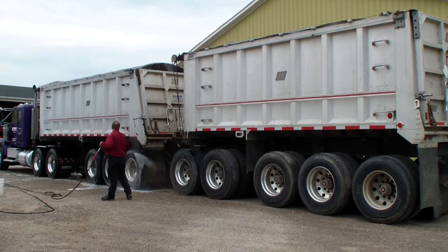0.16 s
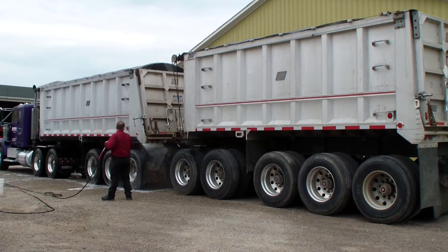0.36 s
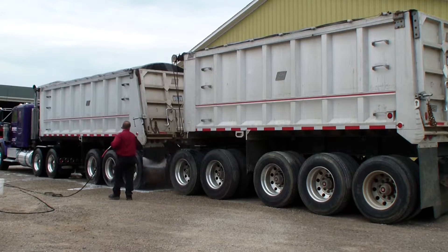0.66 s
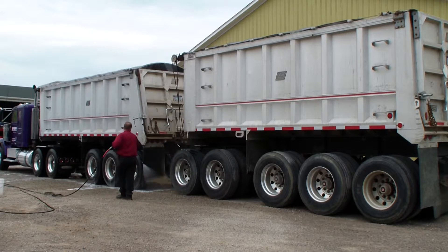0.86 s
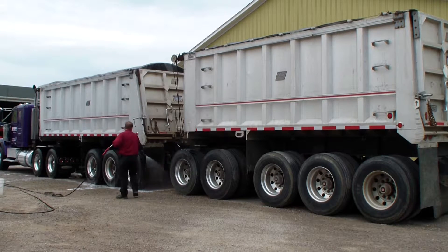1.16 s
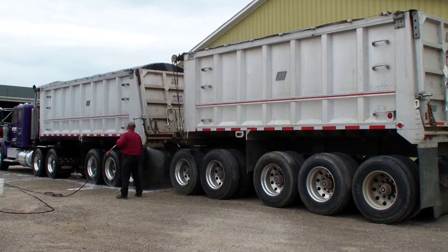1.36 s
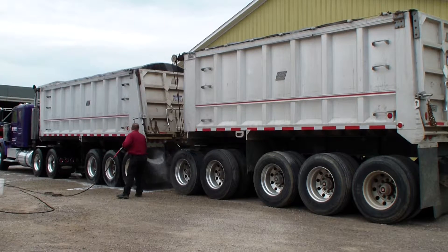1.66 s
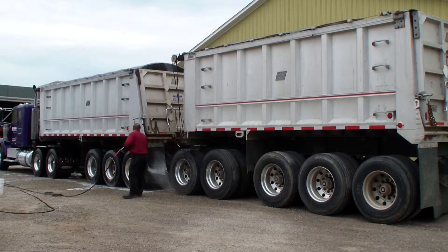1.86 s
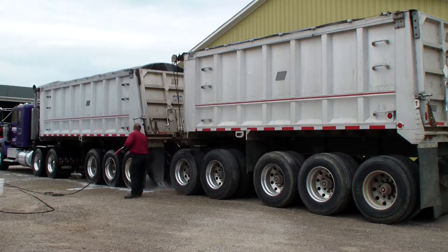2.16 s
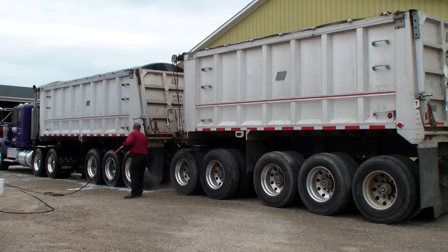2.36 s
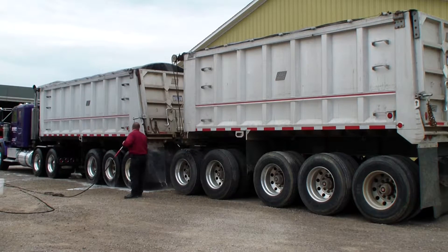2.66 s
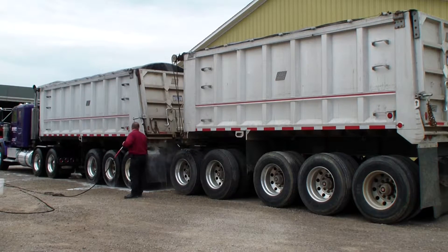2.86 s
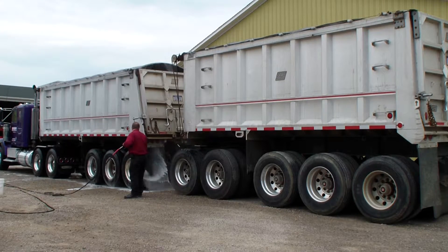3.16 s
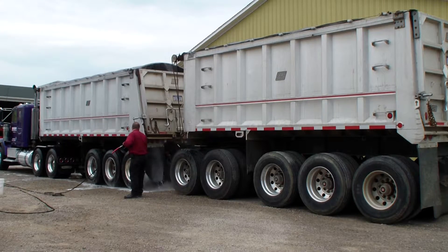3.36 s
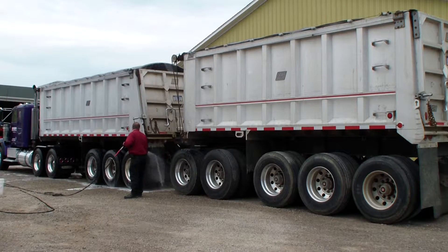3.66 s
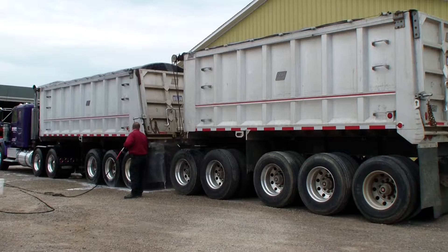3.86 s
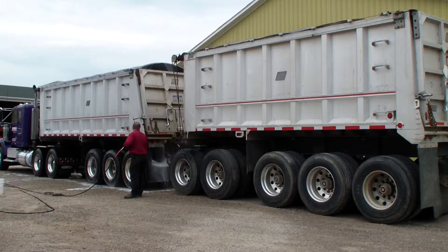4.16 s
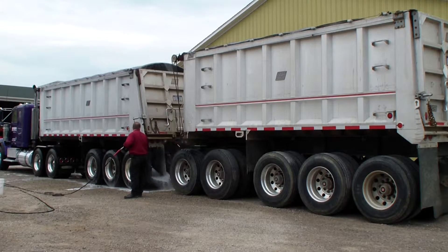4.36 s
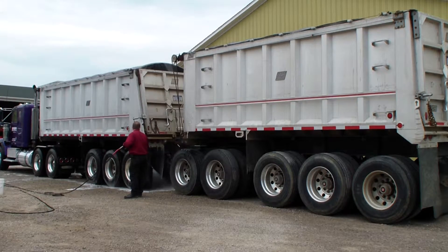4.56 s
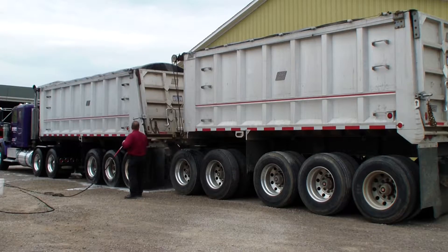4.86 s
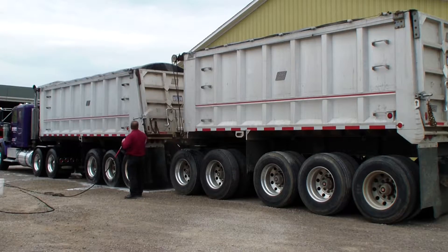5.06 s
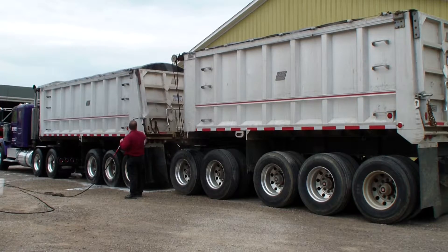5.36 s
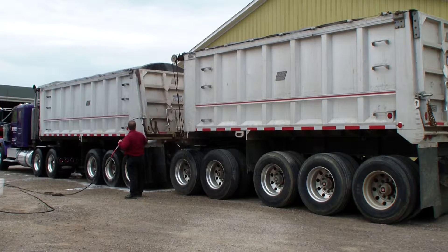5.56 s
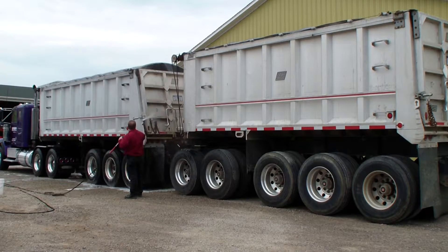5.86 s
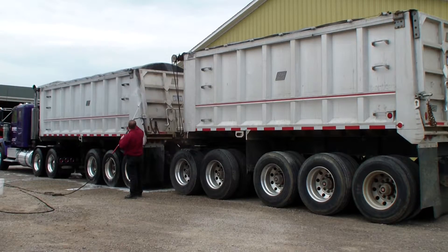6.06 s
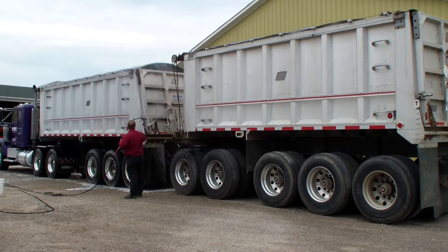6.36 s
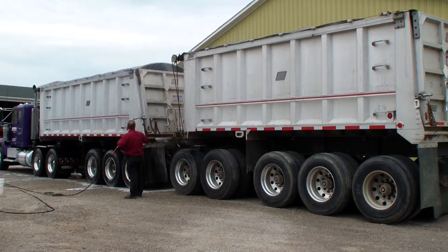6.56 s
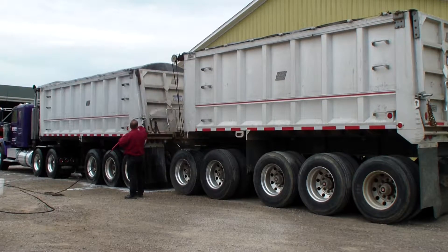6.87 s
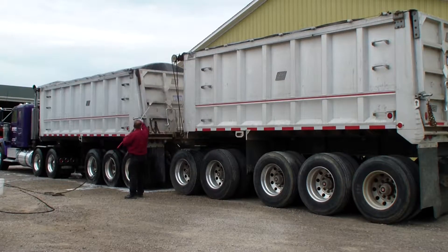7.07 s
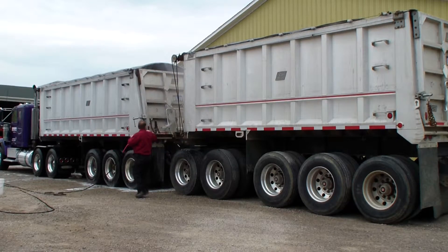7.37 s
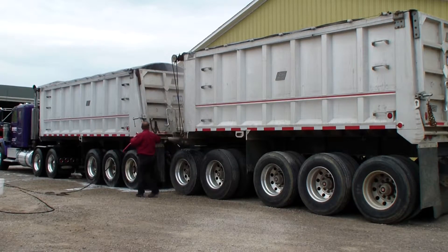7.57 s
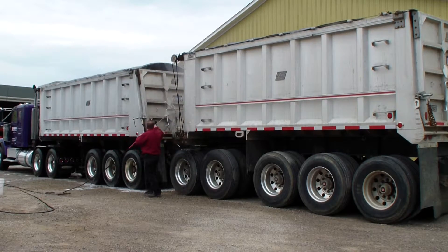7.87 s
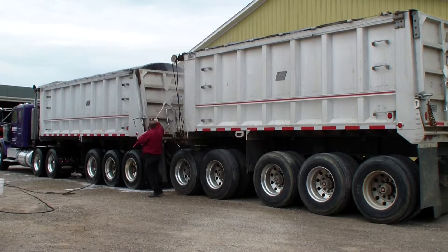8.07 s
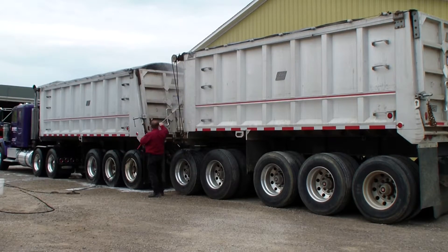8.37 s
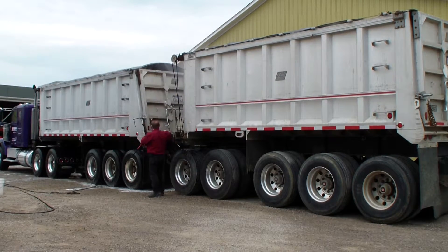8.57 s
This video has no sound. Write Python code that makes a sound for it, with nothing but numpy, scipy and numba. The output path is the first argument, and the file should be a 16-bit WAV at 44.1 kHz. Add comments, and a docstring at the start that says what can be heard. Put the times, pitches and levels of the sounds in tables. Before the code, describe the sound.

A continuous low hum dominates, flickering and briefly dipping, over steady engine tones and rattle. Pressure-washer spray hisses and patters against a trailer, its bright mist rising and falling, with short scattered echoes from wheels and ground. The outdoor stereo microphone is unprotected: gusts rumble, flutter and thump, strongest in the second half, slightly to the left, while fast gain control lifts and ducks everything.

```python
"""A trailer is hosed down with a pressure washer in an open yard.
From the start its engine and pump run as steady shaft tones, clatter and roar, beside a deep wavering drone.
The jet drums on wheels and panels as droplet impacts, and throws a hissing mist as the wand sweeps.
Filtered noise makes the gusts that ruffle the microphone more and more; dull pops join in from 0.35 s.
Throughout, the recorder's fast gain control lifts the hiss when the drone fades and ducks it under gusts."""
import sys
import numpy as np
from scipy import signal
from scipy.fft import rfft, irfft
from scipy.io import wavfile
from numba import njit

SR = 44100
rng = np.random.default_rng(int(sys.argv[2]) if len(sys.argv) > 2 else 0)


def dump_mix(stems):
    """Bounce the given channels to the path in sys.argv[1] as a 16-bit WAV at rate SR."""
    frames = np.atleast_2d(stems).T  # one column per channel
    limited = np.clip(frames, -1, 1)  # hard clip at full scale
    pcm = np.round(limited * 32767).astype(np.int16)
    wavfile.write(sys.argv[1], SR, pcm)


N = 384552  # length in samples
TIME = np.arange(N) / SR  # seconds
COARSE_TIME = TIME[::64]  # enough points for slow curves
FREQS = np.maximum(np.fft.rfftfreq(N, 1 / SR), 1)  # Hz, kept above zero for the logarithm
SIDES = np.array([[1], [-1]])  # left and right, with opposite signs
# All levels in the tables and settings are those before the gain control.


def undb(db):
    """Turn decibels into a gain."""
    return 10 ** (np.asarray(db) / 20)


def unit(x):
    """Scale a sound to an rms level of 1."""
    return x / np.sqrt(np.mean(x ** 2))


def lean(db):
    """Gains for left and right that make the left louder than the right by db."""
    return undb(SIDES * db / 2)


def curves(table):
    """Join the points of a timed table by straight lines, one curve for each column after the time."""
    time_s, *columns = np.transpose(table)
    return [np.interp(TIME, time_s, column) for column in columns]


def swells(table):
    """Add up bell-shaped swells, each with a middle_s, a length_s at half height and a size."""
    total = 0
    for middle_s, length_s, size in table:
        total = total + size * .5 ** np.minimum((2 * (COARSE_TIME - middle_s) / length_s) ** 2, 20)
    return np.interp(TIME, COARSE_TIME, total)


def noise():
    """White noise: equally strong at every pitch."""
    return rng.standard_normal(N)


def walk(rate_hz):
    """Smooth random wandering of spread 1, moving up to about rate_hz times a second."""
    count = len(COARSE_TIME)
    slow = np.exp(-(np.fft.rfftfreq(count, COARSE_TIME[1]) / rate_hz) ** 2)
    wander = irfft(rfft(rng.standard_normal(count)) * slow, count)
    return np.interp(TIME, COARSE_TIME, unit(wander))


def shape(x, spectrum):
    """Filter a sound by a spectrum whose points are joined on a log-frequency axis."""
    hz, db = np.transpose(spectrum)
    gain_db = np.interp(np.log(FREQS), np.log(hz), db)
    return irfft(rfft(x) * undb(gain_db), N)


def ring(x, modes):
    """Let a sound drive resonances, each with its own pitch_hz, width_hz and level_db."""
    drive = rfft(x)
    total = 0
    for pitch_hz, width_hz, level_db in modes:
        response = 1 / (1 + 1j * (FREQS - pitch_hz ** 2 / FREQS) / width_hz)
        total = total + undb(level_db) * unit(irfft(drive * response, N))
    return total


def tones(turns, orders, waver_db, smear):
    """Multiples of a shaft's rotation; moving air makes each waver, the high ones most."""
    total = 0
    for order, level_db in orders:
        turn = order * turns + rng.random()
        phase = 2 * np.pi * turn + smear * np.sqrt(order) * walk(2.9)
        total = total + undb(level_db + waver_db * walk(4.9)) * np.sqrt(2) * np.sin(phase)
    return total


def clatter(turns, size=1500):
    """Valves, pistons and belts knock out the same ragged pattern on every turn of a shaft."""
    pattern = rng.standard_normal(size)
    place = (turns + 0.0019 * walk(8.7)) % 1 * size  # the timing wavers a little
    return np.interp(place, np.arange(size), pattern)


# engine speed: time_s, shaft_turns_per_second
ENGINE_SPEED = [(0.0, 29.5), (0.98, 29.31), (1.35, 29.66), (2.13, 29.38), (4.07, 29.5), (4.35, 29.72),
                (4.61, 29.47), (4.98, 29.62), (5.33, 29.25), (6.76, 29.4), (7.07, 29.7), (7.32, 29.28),
                (7.95, 29.6), (8.3, 29.13)]
# engine tones: multiple_of_shaft_rate, relative_level_db
ENGINE_TONES = [(1, -33.5), (2, -34.5), (3, -36), (4, -32.5), (5, -32), (6, -41.5), (8, -51.5), (10, -41.5),
                (11, -42), (16, -48), (25, -53), (26, -47.5), (29, -46), (30, -52), (32, -47.5),
                (39, -52.5), (40, -53)]
# pump tones: multiple_of_pump_shaft_rate, relative_level_db
PUMP_TONES = [(5, -43.5), (8, -44.5), (10, -34), (11, -55), (20, -44), (25, -46), (28, -56.5), (55, -52.5)]
# colour of the clatter: pitch_hz, relative_level_db
CLATTER_SPECTRUM = [(150, -28), (340, -5), (550, 15), (620, -2.5), (740, -10.5), (1150, 2.5), (1450, -0.5),
                    (2600, -3), (4500, -20), (8000, -38)]
# ringing of the engine casing: pitch_hz, width_hz, level_db
CASING_RINGS = [(718.4, 16.5, -46.5), (1091, 7, -49.5), (1161, 9, -52), (1249, 25, -49.5), (1596, 27, -55),
                (1705, 18, -64), (1825, 13, -90), (2322, 48, -48.5), (2505, 79, -45.5), (2702, 21, -51)]
# colour of the low roar: pitch_hz, relative_level_db
ROAR_SPECTRUM = [(30, -3), (65, -3.5), (98, 1), (135, -9.5), (250, -12.5), (370, -19), (520, -21),
                 (620, -28), (760, -35), (1400, -34.5), (4000, -67)]


def machine(whine_db=-47.5, clatter_db=-43.0, roar_db=-29, knock=0.18, tones_db=-0.1):
    """Engine and belt-driven pump: shaft tones, a thin whine, clatter, a ringing casing and a low roar."""
    turns = np.cumsum(curves(ENGINE_SPEED)[0]) / SR
    pump_turns = turns * 2 / 3
    engine_tones = tones(turns, ENGINE_TONES, waver_db=1.5, smear=0.046)
    pump_tones = tones(pump_turns, PUMP_TONES, waver_db=2.5, smear=0.044)
    whine = tones(turns * 78.8, [(1, whine_db)], waver_db=2.5, smear=0.6856)
    rattle = undb(clatter_db) * unit(shape(clatter(turns) + clatter(pump_turns), CLATTER_SPECTRUM))
    # the noisy parts pulse five times per turn of the shaft
    knocks = 1 + knock * np.cos(2 * np.pi * turns * 5)
    casing = ring(noise() * knocks, CASING_RINGS)
    roar = undb(roar_db + 0.53 * walk(13)) * unit(shape(noise() * knocks, ROAR_SPECTRUM))
    return undb(tones_db) * (engine_tones + pump_tones) + whine + casing + rattle + roar


# deep fades of the drone: middle_s, length_s (at half depth), depth_db
DRONE_FADES = [(.02, 0.069, 3.5), (.3, 0.045, 7), (.85, 0.046, 4), (1.03, 0.061, 6.5), (1.27, 0.077, 6),
               (1.55, 0.05, 4.5), (2.06, 0.04, 8), (2.16, 0.058, 6.5), (2.63, .06, 2), (3.54, 0.1, 5.5),
               (3.76, 0.056, 7), (4.15, 0.063, 7), (4.36, 0.059, 4.5), (4.56, 0.063, 11),
               (4.82, 0.066, 4.5), (5.02, 0.09, 3), (5.74, .08, 3.5), (5.93, 0.085, 4.5), (6.08, 0.033, 6),
               (6.25, 0.072, 6), (6.57, 0.064, 7), (6.7, .08, 3), (6.85, 0.1, 5), (7.07, 0.058, 3.5),
               (7.51, 0.12, 5.5), (7.92, 0.095, 4.5), (8.4, 0.042, 0)]


def drone(pitch_hz=78.55, level_db=-14.5, wobble=0.26, wander_hz=0.746, throb_db=1.03):
    """The machine's nearly pure low note throbs unevenly in level and phase, and now and then fades deeply."""
    hz = pitch_hz + wander_hz * walk(2.58)
    phase = 2 * np.pi * np.cumsum(hz) / SR + wobble * walk(21)
    loudness_db = level_db + throb_db * walk(27) - swells(DRONE_FADES)
    return undb(loudness_db) * np.sqrt(2) * np.sin(phase)


def drops(rate, spread_db):
    """Impacts of droplets, about rate of them a second, of very uneven size."""
    hit = rng.random(N) < rate / SR
    size_db = spread_db * np.minimum(rng.exponential(size=N), 4)
    return unit(hit * noise() * undb(size_db))


# stereo width of the water sound: pitch_hz, side_minus_mid_db
WATER_WIDTH = [(200, -23), (700, -19), (2400, -14.5), (4500, -23), (5300, -11), (6000, -0.5), (7500, -14),
               (11000, -6), (15000, -5)]


def water(spectrum, level_db, rate, spread_db, flicker_db):
    """A cloud of droplet impacts over smooth hiss; the jet sputters, and its treble spreads wide."""
    mid = unit(shape(drops(rate, spread_db) + noise(), spectrum))
    side = unit(shape(drops(rate, spread_db) + noise(), spectrum))
    return undb(level_db + flicker_db * walk(31)) * (mid + SIDES * shape(side, WATER_WIDTH))


def glance(x, lag_ms=0.706, sweep=.4, echo=0.25):
    """The nearby panel reflects the jet; the lag changes as the wand moves and sweeps the colour."""
    lag = lag_ms * np.exp(sweep * walk(1.38))
    place = np.arange(N) - lag * SR / 1000
    reflection = np.array([np.interp(place, np.arange(N), channel) for channel in x])
    return (x + echo * reflection) / np.hypot(1, echo)


def wheels(x, share=0.31, spread_s=.012, count=24):
    """Rims, axles and ground scatter the spray sound into a short cluster of echoes."""
    lags_s = rng.uniform(.001, spread_s, count)
    sizes = rng.standard_normal(count)
    response = np.zeros(N)
    response[np.round(lags_s * SR).astype(int)] = share * sizes / np.linalg.norm(sizes)
    echoes = irfft(rfft(x) * rfft(response), N)
    return (x + echoes) / np.hypot(1, share)


# faint whistles of the nozzle: pitch_hz, width_hz, relative_level_db
NOZZLE_WHISTLES = [(7140, 100, -55), (8600, 42, -58), (9370, 100, -57), (11800, 80, -65), (12750, 80, -64)]


def nozzle(start_db=3.0, fade_db_per_s=-.5):
    """Narrow resonances whistle in the jet, separately left and right, fading as the wand turns away."""
    whistles = np.array([ring(noise(), NOZZLE_WHISTLES) for _ in range(2)])
    return whistles * undb(start_db + fade_db_per_s * TIME)


# mist thrown as the wand sweeps: time_s, amount_db (multiplied by the growth settings of jet)
WAND_SWEEP = [(0, -2), (.72, -2.5), (1.38, -2.5), (1.68, 3.5), (2.04, 5.5), (2.16, 0), (2.71, -2.5),
              (2.95, 2), (3.19, -2), (3.25, 3), (3.49, -4), (3.97, 5), (4.15, 0), (4.87, -2.5), (4.99, 2),
              (5.29, -3), (5.59, 0.5), (5.95, 3.5), (6.28, -4), (6.8, 2), (7.76, -1.5), (7.82, 9.5),
              (7.94, 0), (8.72, -4)]
# how hard the jet strikes the trailer: time_s, splash_level_db
JET_STRIKE = [(0, -33.5), (1.7, -34.5), (2.15, -33.5), (2.35, -34.5), (3.35, -35.5), (3.9, -34), (5.5, -35),
              (5.93, -33), (6.4, -35.5), (6.85, -34), (7.25, -35.5), (7.9, -34.5), (8.72, -34)]
# colours of the splash, the mist and the finest fizz: pitch_hz, relative_level_db
SPLASH_SPECTRUM = [(200, 1), (500, 0), (630, 2), (760, 3), (1150, 0), (1430, -3), (1900, -2.5),
                   (2600, -3.5), (3100, -7), (5000, -9.5), (6300, -17.5), (9000, -21), (15000, -49)]
MIST_SPECTRUM = [(1000, -9), (3000, 1.5), (5000, -0.5), (6200, -1), (7800, 2), (10000, -1.5), (12000, -8.5),
                 (15500, -18)]
FIZZ_SPECTRUM = [(4000, -28), (8000, -12), (10500, -1), (12500, 1), (15500, -3.5)]


def jet(mist_db=-43.0, fizz_db=-49, mist_growth=0.83, fizz_growth=1.3, hiss_lean_db=-1.0):
    """The jet splashes on the trailer; where it throws more mist, the finest fizz grows fastest."""
    sweep_db, = curves(WAND_SWEEP)
    splash_db, = curves(JET_STRIKE)
    mist_level_db = mist_db + mist_growth * sweep_db
    fizz_level_db = fizz_db + fizz_growth * sweep_db
    splash = water(SPLASH_SPECTRUM, splash_db, rate=5000, spread_db=2.5, flicker_db=1.46)
    mist = water(MIST_SPECTRUM, mist_level_db, rate=7000, spread_db=1.0, flicker_db=1.3)
    fizz = water(FIZZ_SPECTRUM, fizz_level_db, rate=7800, spread_db=4.5, flicker_db=0.7)
    hiss = glance(mist + fizz) * lean(hiss_lean_db)
    return wheels(splash + hiss) + nozzle()


# the breeze between gusts: time_s, relative_strength_db
BREEZE_STRENGTH = [(0, -7), (1.35, -5.5), (1.7, -0.5), (2.4, 0), (3.25, -1.5), (3.8, 2), (4.5, 1),
                   (5.3, -3), (6.3, -3.5), (6.85, -7.5), (7.15, 3.5), (7.8, -2), (8.1, 4.5), (8.72, 6)]
# gusts: middle_s, length_s (at half height), rise_above_breeze_db, extra_turbulence_db
WIND_GUSTS = [(0.335, 0.18, 9, -10), (.61, .09, 5, -4), (1.783, .06, 6, -21), (2.229, 0.047, 11.5, -7),
              (2.34, .08, 6, -2), (2.92, 0.12, 8.5, -5.5), (4.68, 0.1, 6.5, 4.5), (6.12, 0.094, 6, 5),
              (6.482, 0.17, 8.5, 12.5), (7.014, 0.044, 5, 3), (7.227, 0.17, 4, -3), (7.46, .16, 5.5, 7.5),
              (7.592, 0.039, 7, -3.5), (8.048, 0.14, 4.5, 8), (8.293, 0.11, 2, 3), (8.41, 0.1, 2.5, 6.5),
              (8.607, 0.1, 2.5, 5.5), (8.702, 0.081, 2, 2.5)]
# colours of the rumble, the flutter and the small eddies: pitch_hz, relative_level_db
RUMBLE_SPECTRUM = [(10, -16), (25, 0.5), (42, 3.5), (110, -0.5), (160, -7.5), (250, -29), (500, -37),
                   (1500, -75)]
FLUTTER_SPECTRUM = [(60, -52), (150, 3), (240, 1), (400, -12), (600, -24), (900, -29), (1500, -40),
                    (4000, -66)]
EDDY_SPECTRUM = [(100, -2), (190, 6.5), (320, 1), (550, -4), (800, -32), (1400, -50), (4000, -67)]


def wind(rumble_db=-27, flutter_db=-39.0, eddy_db=-55, push_db=-29, lean_db=3,
         flutter_growth=1.95, eddy_growth=3.11, push_growth=1.2):  # growth: dB per dB of wind strength
    """Gusts hit each microphone port separately; the strongest break into small, brighter eddies."""
    rises = [(middle, length, rise) for middle, length, rise, _ in WIND_GUSTS]
    churns = [(middle, length, churn) for middle, length, _, churn in WIND_GUSTS]
    strength_db = curves(BREEZE_STRENGTH)[0] + swells(rises)
    churn_db = swells(churns)
    ports = []
    for _ in range(2):
        rumble_level_db = rumble_db + strength_db + 0.4 * walk(17)
        flutter_level_db = flutter_db + flutter_growth * strength_db + churn_db + 2.0 * walk(34.07)
        eddy_level_db = eddy_db + eddy_growth * strength_db + churn_db
        rumble = undb(rumble_level_db) * unit(shape(noise(), RUMBLE_SPECTRUM))
        flutter = undb(flutter_level_db) * unit(shape(drops(450, 1.7), FLUTTER_SPECTRUM))
        eddies = undb(eddy_level_db) * unit(shape(drops(500, 1.5), EDDY_SPECTRUM))
        ports.append(rumble + flutter + eddies)
    # the steady push is too slow to hear, but it drives the gain control
    push = undb(push_db + push_growth * strength_db)
    return np.array(ports) * lean(lean_db) + push


# hard buffets of wind: peak_time_s, thump_peak_db (before leaning left)
WIND_BUFFETS = [(.354, -19), (2.221, -12), (4.619, -6), (4.635, -3.5), (4.638, -7), (7.417, -13),
                (8.048, -1), (8.296, -12), (8.576, -0.5)]


def buffets(thump_s=0.0007, lean_db=4):
    """Each buffet of wind is a dull pop of pressure, harder on the windward port."""
    pops = 0
    for peak_s, peak_db in WIND_BUFFETS:
        pops = pops + undb(peak_db) / (1 + ((TIME - peak_s) / thump_s) ** 2) ** 2
    return pops * lean(lean_db)


@njit
def follow(size, attack_s, release_s):
    """Envelope that rises fast with the peaks and sinks slowly."""
    envelope = np.empty(len(size))
    level = size[:1024].max()
    for i in range(len(size)):
        reaction_s = attack_s if size[i] > level else release_s
        level += (size[i] - level) / (SR * reaction_s)
        envelope[i] = level
    return envelope


def gain_control(x, target_db=-9.5, slope=0.97, attack_s=0.0015, release_s=0.047):
    """One fast gain for both channels that holds the peaks near a set level."""
    loudest = np.abs(x).max(axis=0)
    return (undb(target_db) / follow(loudest, attack_s, release_s)) ** slope


def scene():
    """Add the machine, its drone and the spray to the wind at the microphone."""
    return machine() + drone() * lean(-.4) + jet() + wind() + buffets()


def record(dry, rumble_cut_hz=18, top_hz=15750, ease_s=.002):
    """The gain control pumps, the deepest rumble is shed, the ends are eased and the top is cut off."""
    highpass = signal.butter(1, rumble_cut_hz, "highpass", fs=SR, output="sos")
    lowpass = signal.ellip(10, .1, 80, top_hz, fs=SR, output="sos")
    # the gain listens to the sound before the rumble is shed
    out = signal.sosfilt(highpass, dry) * gain_control(dry)
    ends = np.minimum(np.minimum(TIME, TIME[-1] - TIME) / ease_s, 1)
    return signal.sosfilt(lowpass, out * ends)


dry = scene()
out = record(dry)
dump_mix(out)
```